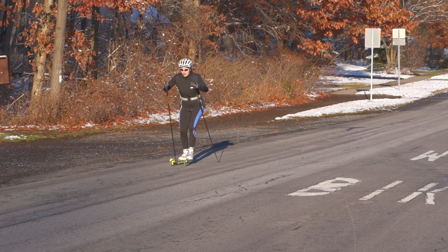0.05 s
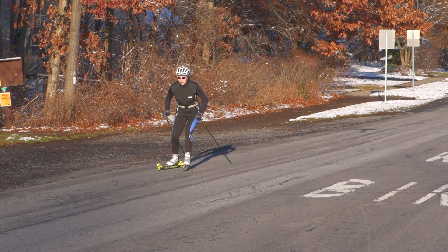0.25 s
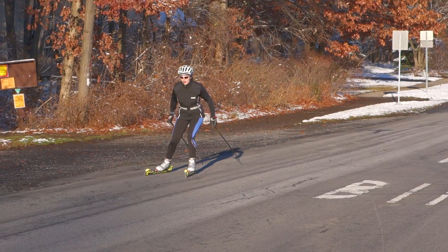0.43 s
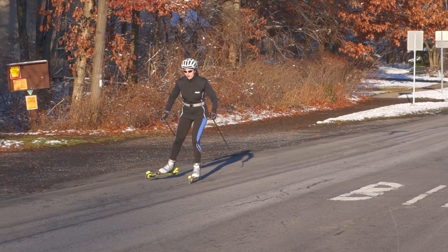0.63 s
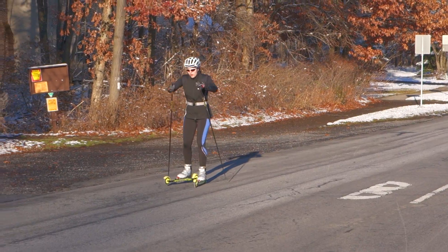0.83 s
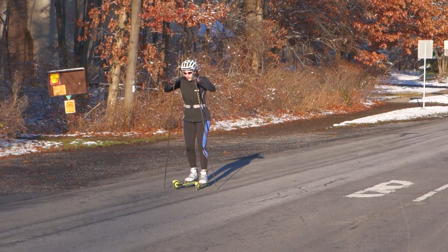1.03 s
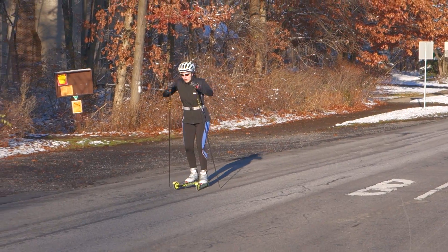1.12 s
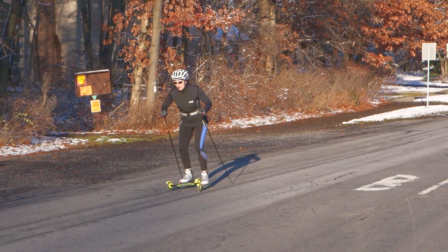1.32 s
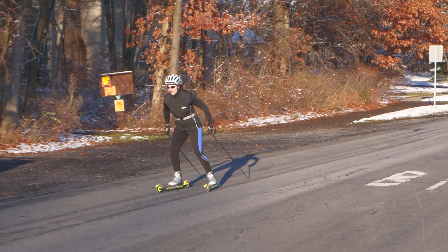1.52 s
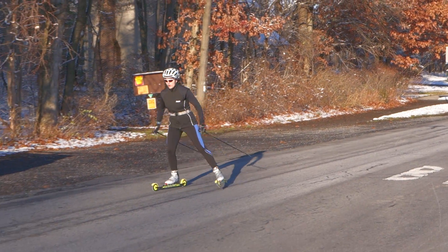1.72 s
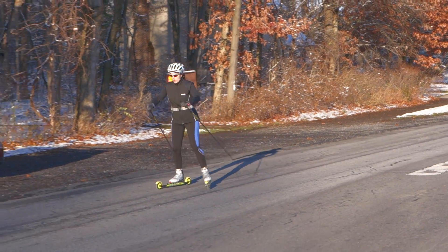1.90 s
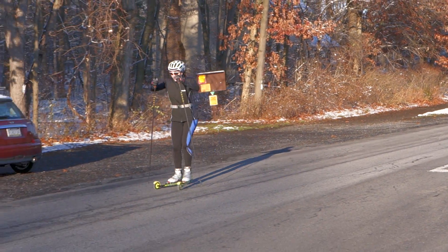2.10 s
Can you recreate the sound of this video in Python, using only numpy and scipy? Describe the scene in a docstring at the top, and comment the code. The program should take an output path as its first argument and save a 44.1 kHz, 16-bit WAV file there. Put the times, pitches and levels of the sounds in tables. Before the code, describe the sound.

Roller skis rumble along a road as pole tips click and a faint zoom motor buzzes.

```python
"""Roller skier beside a wood

A roller skier skates along an asphalt road, the wheels rumbling and hissing with every stride.
Hard pole tips bite the road and the trees throw each hit back as a soft wash. The skis clack, land
and scrub. Part-way through, a camera's small zoom motor starts to buzz close to the microphones."""
import sys
import numpy as np
from scipy import signal
from scipy.fft import rfft, irfft, next_fast_len
from scipy.io import wavfile

SR = 44100
rng = np.random.default_rng(int(sys.argv[2]) if len(sys.argv) > 2 else 0)


def to_wav(sig):
    """Store sig (one row per channel, or 1-D mono) as 16-bit WAV at the path in sys.argv[1].

    Samples outside -1..1 are clipped; the rate is SR.
    """
    pcm = np.clip(np.atleast_2d(sig), -1, 1) * 32767
    pcm = np.round(pcm).astype(np.int16)
    wavfile.write(sys.argv[1], SR, pcm.T)  # frames by channels


N = 94815
T = np.arange(N) / SR
HIT_T = T[:4096]
TYRE_PAN_DB = 2.5


def from_db(db):
    """Decibels to gain."""
    return 10 ** (np.asarray(db) / 20)


def rms_one(x):
    """Scale to an rms of 1."""
    return x / np.sqrt(np.mean(x ** 2) + 1e-20)


def pan(db):
    """Left and right gains for a level difference; positive leans left."""
    return from_db(np.array([[db], [-db]]) / 2)


def level(rows):
    """Gain riding a curve of (seconds, dB) points."""
    return from_db(np.interp(T, *np.transpose(rows)))


def at_hz(points, hz):
    """Read a curve on a log-frequency axis."""
    freqs, values = np.transpose(points)
    return np.interp(np.log(hz + 1), np.log(freqs), values)


def drift(rate_hz):
    """Smooth random wander; rms 1."""
    r = np.exp(-2 * np.pi * rate_hz / SR)
    return rms_one(signal.lfilter([1], [1, -2 * r, r * r], rng.standard_normal(2 * N))[N:])


def band(x, low, high, order=2):
    """Band-pass between two edges in Hz; rms 1."""
    sos = signal.butter(order, [low, high], "band", fs=SR, output="sos")
    return rms_one(signal.sosfilt(sos, x + 1e-18))


def ring(x, hz, t60):
    """One mode, dying by 60 dB in t60 seconds; rms 1."""
    r = from_db(-60 / (t60 * SR))
    w = 2 * np.pi * hz / SR
    return rms_one(signal.lfilter([1, 0, -1], [1, -2 * r * np.cos(w), r * r], x + 1e-18))


def modes(x, table):
    """A struck object rings in its modes of (Hz, dB, t60); rms 1."""
    return rms_one(sum(from_db(db) * ring(x, hz, t60) for hz, db, t60 in table))


def stereo(mid, side, coherence):
    """Two noises become left and right: alike at coherence 1, opposed at -1."""
    return np.sqrt(1 + coherence) * mid + np.sqrt(1 - coherence) * side * [[1], [-1]]


def outdoor_noise(spectrum):
    """Coloured stereo noise, centred in the bass and wide in the treble; rms 1."""
    # How alike left and right are outdoors. Each row: frequency in Hz, coherence.
    likeness = [(100, 0.99), (240, 1), (480, 0.88), (950, 0.79), (1900, 0.44), (3800, 0.41), (7500, 0),
                (15000, 0.21)]
    size = next_fast_len(N)
    hz = np.arange(size // 2 + 1) * SR / size
    mid, side = rfft(rng.standard_normal((2, size)))
    pair = stereo(mid, side, at_hz(likeness, hz))
    return rms_one(irfft(pair * from_db(at_hz(spectrum, hz)), size)[:, :N])


def contact(length_s):
    """A brief skid over grit: dense tiny impacts, even in colour."""
    rise, hold = .3, .75  # shares of the length
    progress = HIT_T / length_s
    swell = np.sin(np.pi / 2 * np.minimum(progress / rise, 1))
    shape = swell * np.minimum(1, from_db(-24 * (progress - hold)))
    impacts = rng.standard_normal(len(HIT_T)) * from_db(3 * rng.standard_normal(len(HIT_T)))
    grit = rfft(shape * impacts)
    whitened = irfft(grit / (np.abs(grit) + 1e-12))
    return whitened * np.sqrt(shape)


def place(out, start_s, hit, db, pan_db):
    """Drop in a hit with the energy of 10 ms at the given level."""
    start = int(start_s * SR)
    sound = from_db(db) * hit * np.sqrt(.01 * SR / np.sum(hit ** 2))
    out[:, start:start + len(hit)] += pan(pan_db) * sound[:N - start]


def wheels():
    """Low rumble, coarse midrange roar and tyre hiss swell as each ski is loaded."""
    # Swells of the three layers. Each row: time in seconds, relative level in dB.
    rumble_level = [(0, -56.5), (.18, -54.5), (.33, -54), (.4, -51), (.51, -49), (.56, -50), (.72, -51.5),
                    (.85, -57), (.91, -54), (.97, -59), (1.08, -57), (1.2, -53), (1.4, -53.5), (1.57, -54),
                    (1.6, -49.5), (1.64, -51), (1.85, -53), (2.15, -55)]
    roar_level = [(0.0, -69.5), (0.47, -70.5), (0.65, -69), (0.81, -72.5), (1.0, -76), (1.71, -69),
                  (2.15, -73)]
    hiss_level = [(0, -71), (.18, -60.5), (.36, -54.5), (.48, -55), (.64, -54), (.8, -60.5), (1.1, -65),
                  (1.22, -58), (1.45, -60), (1.62, -59), (1.8, -63), (2.15, -60.5)]
    # Their tone colours. Each row: frequency in Hz, relative level in dB.
    rumble_colour = [(20, -58), (40, -16), (62, -8.5), (90, -11.5), (125, 1.5), (160, -4), (215, 2),
                     (270, -3), (340, -8.5), (430, -21.5), (600, -26), (1200, -78)]
    roar_colour = [(30, -26), (200, -1.5), (400, -9), (560, -6.5), (700, 3), (820, 0), (1000, -13.5),
                   (1300, -3), (1600, -51), (3000, -36)]
    hiss_colour = [(30, -25), (300, -0.5), (1000, -4), (1300, -0.5), (1550, -0.5), (2000, 7.5), (3200, 2),
                   (4300, -2), (7500, -7), (11000, -9), (16000, -24)]
    rumble = level(rumble_level) * outdoor_noise(rumble_colour)
    roar = from_db(1.5) * level(roar_level) * outdoor_noise(roar_colour)
    hiss = level(hiss_level) * outdoor_noise(hiss_colour)
    flicker = from_db(1.5 * drift(rate_hz=12))
    return rumble + (roar + hiss) * flicker * pan(TYRE_PAN_DB)


def opening_wash():
    """The echo of a pole stroke just before the start dies away in the trees."""
    # Colour of the wash. Each row: frequency in Hz, relative level in dB.
    colour = [(600, -15), (1500, -7), (2700, 1.5), (4500, -5), (7500, -8.5), (11000, -21.5), (16000, -38)]
    peak_db, peak_s, t60_s = -48, 0.026, 0.76
    rise = (T / peak_s + 1) / 2
    decay = from_db(-60 * (T - peak_s) / t60_s)
    return from_db(peak_db) * np.minimum(rise, decay) * outdoor_noise(colour)


def poles():
    """Each steel tip cracks on the asphalt, rings with its shaft and echoes in the wood."""
    # Pole plants. Each row: start in seconds, level in dB, contact in seconds, crack centre in Hz,
    # tip pitch in Hz, tip ring in dB against the crack, its second and third modes in dB against
    # the first, shaft ring in dB against the crack, pan in dB, echo send in dB.
    plants = [(0.2003, -46, 0.0039, 3950, 2450, 12, -19, -15, -24, 3, -25),
              (0.2248, -26, 0.011, 2410, 2620, -23, 0, -14, 26.5, 2.5, 4.5),
              (.4400, -50.5, 0.0032, 3000, 2620, 6, 5, -16, -25, -1, -2),
              (0.4536, -50, 0.0081, 2660, 2720, -2.5, -21, -19, -12, -2, 0),
              (.460, -50, 0.0032, 3120, 2700, -14, -4, -14, -2, 0, 13),
              (0.5954, -48.5, 0.0026, 3270, 3130, -14, -9, -7, -5, 16, 8),
              (1.1539, -43.5, 0.0046, 3500, 2580, 13, -0.5, -8.5, 2, 1, 3)]
    # Modes of the shaft. Each row: frequency in Hz, relative level in dB, t60 in seconds.
    shaft_modes = [(772, -14.5, 0.04), (1240, -17, 0.085), (1342, -7, 0.04), (1786, -5, 0.079),
                   (2118, 7, 0.021), (2410, -2.5, 0.018), (2580, -4.5, 0.022), (2980, -38, 0.061),
                   (3330, -9.5, 0.043), (3900, -11, 0.034), (5300, -12, 0.03), (5420, -10, 0.018),
                   (5600, -19, 0.013), (6650, -27, 0.035), (6930, -20, 0.045), (7600, -23, 0.034)]
    crack_spread, tip_t60_s, ring_send_db = 1.505, 0.012, -20.5
    soften = signal.butter(4, 9800, fs=SR, output="sos")
    direct, send = np.zeros((2, 2, N))
    for (start_s, db, contact_s, crack_hz, tip_hz, tip_db,
         second_db, third_db, shaft_db, pan_db, send_db) in plants:
        skid = signal.sosfilt(soften, contact(contact_s))
        shaft = from_db(shaft_db) * modes(skid, shaft_modes)
        tip_modes = [(tip_hz * ratio, mode_db, tip_t60_s)
                     for ratio, mode_db in [(1, 0), (1.3, second_db), (1.57, third_db)]]
        tip = from_db(tip_db) * modes(skid, tip_modes)
        snap = from_db(-13) * band(skid, 4300, 8600)
        crack = band(skid, crack_hz / crack_spread, crack_hz * crack_spread) + snap
        place(direct, start_s, crack + tip + shaft, db, pan_db)
        place(send, start_s, crack + from_db(ring_send_db) * (tip + shaft), db + send_db, pan_db=0)
    return direct + signal.fftconvolve(send, wood(), axes=1)[:, :N]


def wood():
    """Impulse response of the roadside: scatter from the ground, then a dying wash from the trunks."""
    # Colour of the echo. Each row: frequency in Hz, relative level in dB.
    colour = [(300, -6), (1000, -3), (1800, -15), (2600, -2), (3500, -1.5), (4800, 2.5), (7500, 0.5),
              (11000, -2), (16000, -33)]
    delay_s, t60_s, scatter_db = 0.041, 0.74, 0.5
    trunk_db, trunk_width_s = 4.5, 0.0053
    shape = from_db(np.where(T < delay_s, scatter_db, -60 * (T - delay_s) / t60_s))
    nearest_trunks = from_db(trunk_db * np.exp(-((T - delay_s) / trunk_width_s) ** 2))
    wash = rms_one(outdoor_noise(colour) * shape * nearest_trunks) / np.sqrt(N)
    return from_db(-12) * pan(3) * wash


def clacks():
    """Short dry knocks, as of skis and bindings, with a bright snap or a low thud."""
    # Each row: start in seconds, level in dB, contact in seconds, knock centre in Hz,
    # snap and thud in dB against the knock, pan in dB.
    knocks = [(.2395, -54, 0.0025, 516, -34, -3, 1), (.6990, -52, .0016, 1770, -34, -5, 10),
              (1.1432, -47, 0.004, 1150, -0.5, -14, 2), (1.907, -54.5, 0.0075, 1050, -34, 4.5, 9.5)]
    spread = 1.85  # band edges as a ratio to the centre
    out = np.zeros((2, N))
    for start_s, db, contact_s, hz, snap_db, thud_db, pan_db in knocks:
        skid = contact(contact_s)
        knock = band(skid, hz / spread, hz * spread)
        snap = from_db(snap_db) * band(skid, 6500, 13000, order=3)
        thud = from_db(thud_db) * ring(skid, hz=344, t60=0.021)
        place(out, start_s, knock + snap + thud, db, pan_db)
    return out


def landings():
    """A ski takes the skier's weight: its rubber wheels give a dull bump."""
    # Each row: start in seconds, level in dB, pitch in Hz.
    bumps = [(.455, -46, 179), (.501, -42.5, 190), (1.597, -44.5, 173)]
    push_s = 0.0035
    push = np.sin(np.pi * np.minimum(HIT_T / push_s, 1)) ** 2
    out = np.zeros((2, N))
    for start_s, db, hz in bumps:
        place(out, start_s, ring(push, hz, t60=0.049), db, pan_db=0)
    return out


def scrubs():
    """Rubber dragged sideways over the asphalt at push-off gives a hollow or hissing scrape."""
    # Each row: peak time in seconds, length in seconds, centre in Hz, width in Hz, peak level in dB.
    scrapes = [(0.466, 0.05, 660, 180, -59), (1.533, 0.15, 342, 134, -61), (1.63, 0.04, 803, 88, -59),
               (1.7, .3, 3000, 150, -75.5), (1.5, 0.38, 4800, 3000, -66)]
    out = 0
    for peak_s, length_s, hz, width, db in scrapes:
        rub = band(rng.standard_normal(N), hz - width / 2, hz + width / 2)
        swell = np.exp(-(2 * (T - peak_s) / length_s) ** 2)
        out = out + from_db(db) * rub * swell
    return out * pan(TYRE_PAN_DB)


def zoom_motor():
    """Motor steps pulse a rasp into the camera body's resonances; the gears make the top ones chatter."""
    # Body resonances. Each row: centre in Hz, width in Hz, final left and right levels in dB,
    # depth of the step pulsing from 0 to 1, growth in dB per second.
    resonances = [(1844, 256, -59, -88, 0.7, 4), (2272, 233, -59, -82, 1, -2),
                  (2614, 360, -78, -80.5, 0.8, -11), (3310, 200, -88, -76, 0.7, 10),
                  (4900, 320, -66.5, -103, 0.1, 4), (7360, 1000, -66, -78, 0, -3),
                  (9100, 900, -70.5, -70.5, 0, -2), (10540, 980, -82, -73.5, 0, -5.5),
                  (11620, 640, -63.5, -56, 0.07, 8), (12100, 400, -68.5, -67.5, 0, -2.5),
                  (12900, 800, -82, -76, 0.2, 2), (14200, 1600, -70, -74, 0.4, 8)]
    # Strength of the gear chatter. Each row: time in seconds, relative level in dB.
    chatter_level = [(.7, 0.5), (.82, -0.5), (1.06, 1.5), (1.27, 3.5), (1.43, 2.5), (1.66, 0.5), (1.78, 1),
                     (1.87, 0), (2.15, -2)]
    start_s, rise_s = 0.676, 0.034
    step_hz, gear_hz, speed_wander, chatter_above_hz = 224.5, 76.5, 0.0124, 6000
    motor_time = np.cumsum(1 + speed_wander * drift(rate_hz=4.84)) / SR
    steps = np.cos(2 * np.pi * step_hz * motor_time)
    flutter_db = 2.3 * drift(rate_hz=39.5)  # the gears run unevenly
    gears_db = flutter_db - 0.5 * np.sin(2 * np.pi * gear_hz * motor_time)
    chatter = level(chatter_level) * rms_one(from_db(gears_db + 2 * drift(rate_hz=90.5)))
    out = 0
    for hz, width, left_db, right_db, depth, growth_db_per_s in resonances:
        mid, side = rng.standard_normal((2, N))
        # The microphones tend to shake in opposition high up, together low down.
        if hz > chatter_above_hz:
            rasp = stereo(mid, side, coherence=-0.31) * chatter
        else:
            rasp = stereo(mid, side, coherence=0.54)
        pulsing = (1 + depth * steps) ** 2
        gain = from_db([[left_db], [right_db]]) * from_db(growth_db_per_s * (T - T[-1]))
        out = out + gain * band(rasp * pulsing, hz - width / 2, hz + width / 2)
    return out * np.clip((T - start_s) / rise_s, 0, 1)


def scene():
    """Skier and wood in front of the microphones; the motor comes through the camera body."""
    right_lead_s = .00005  # the wheels reach the right microphone first
    left, right = wheels() + scrubs()
    rolling = np.array([np.interp(T - right_lead_s, T, left), right])
    return rolling + poles() + opening_wash() + clacks() + landings() + zoom_motor()


def record(dry):
    """A steep low-pass takes off the very top."""
    cutoff_hz = 15900
    return signal.sosfilt(signal.ellip(10, .1, 70, cutoff_hz, fs=SR, output="sos"), dry)


dry = scene()
out = record(dry)
to_wav(out)
```